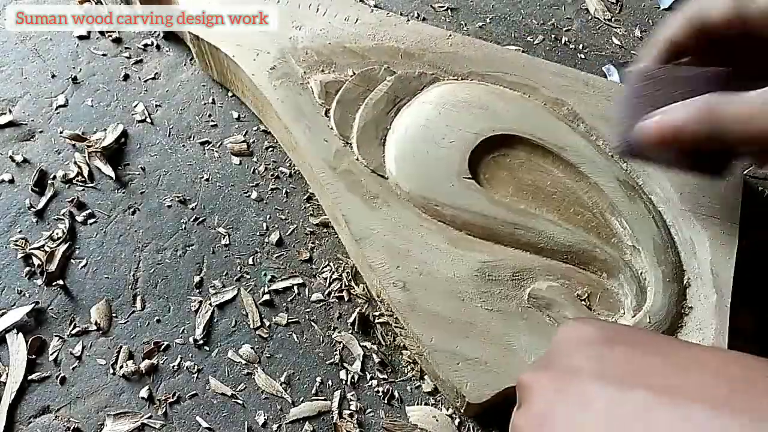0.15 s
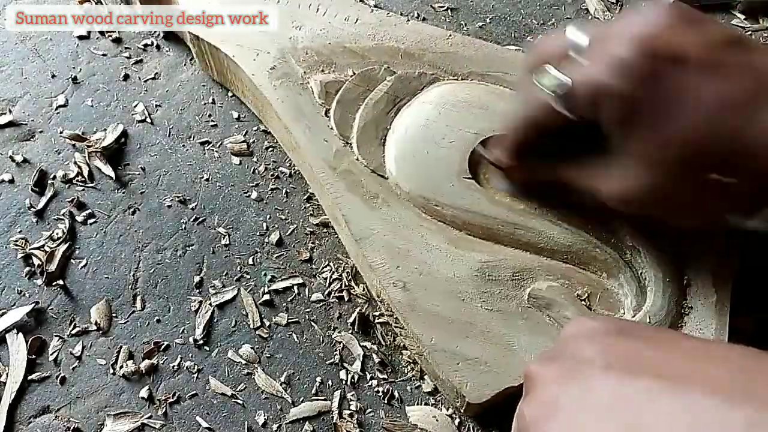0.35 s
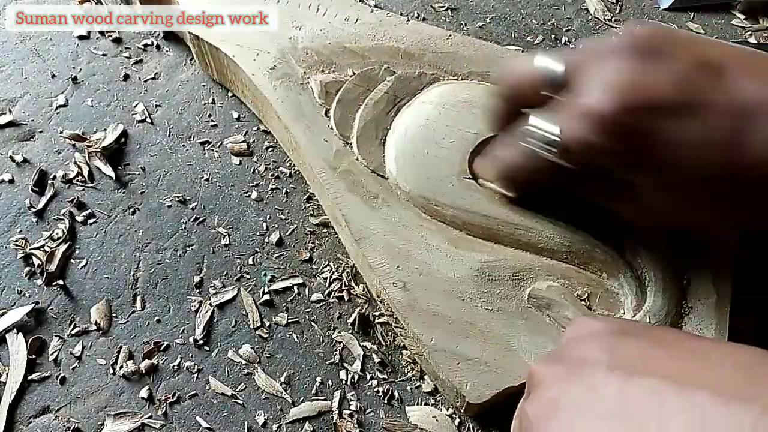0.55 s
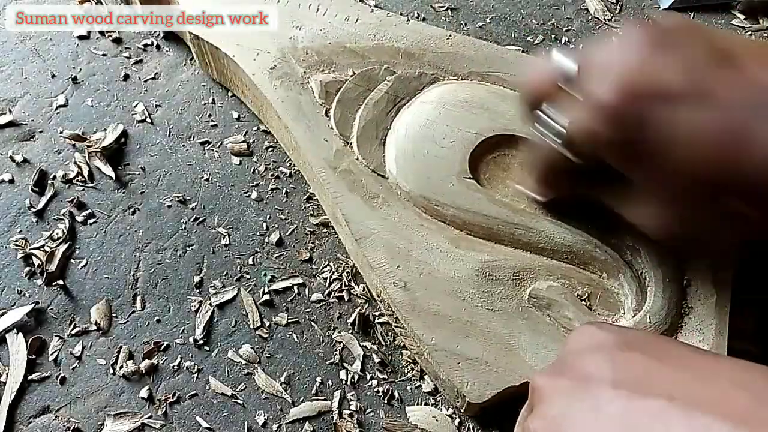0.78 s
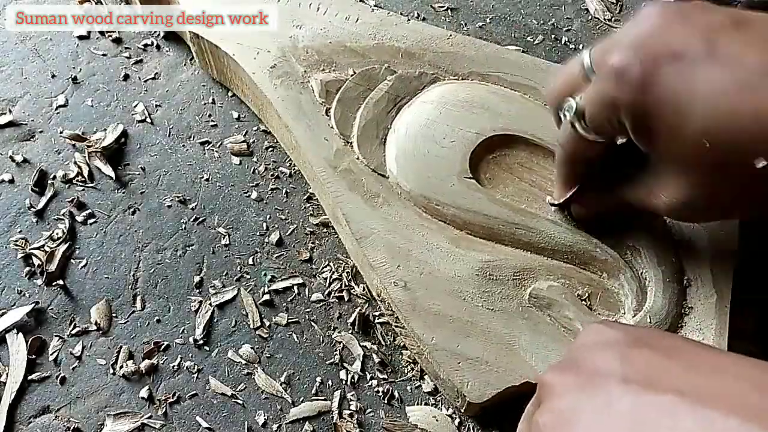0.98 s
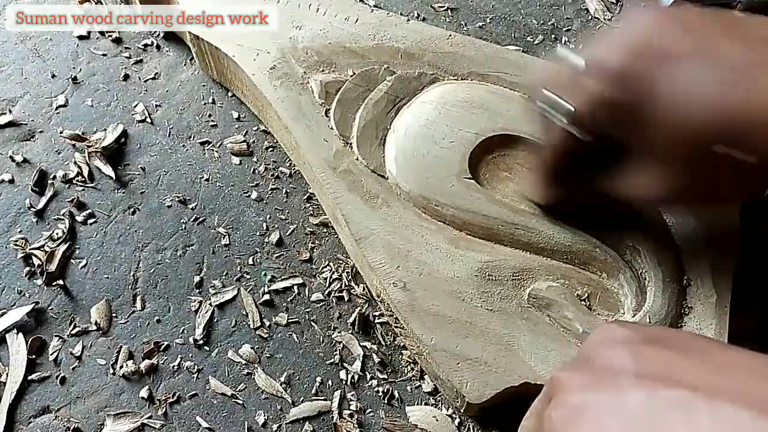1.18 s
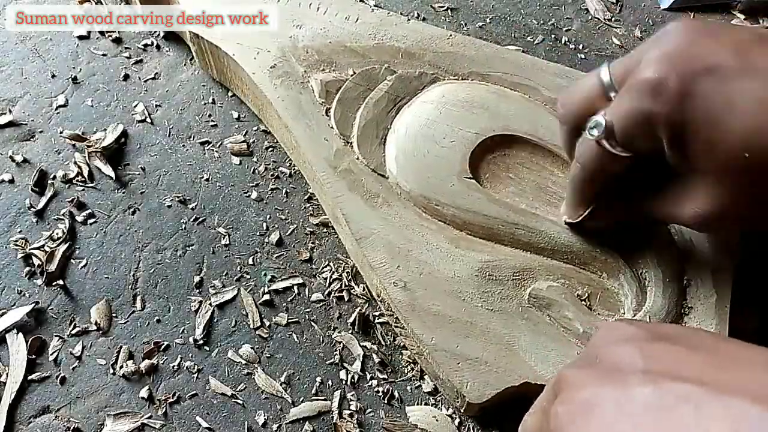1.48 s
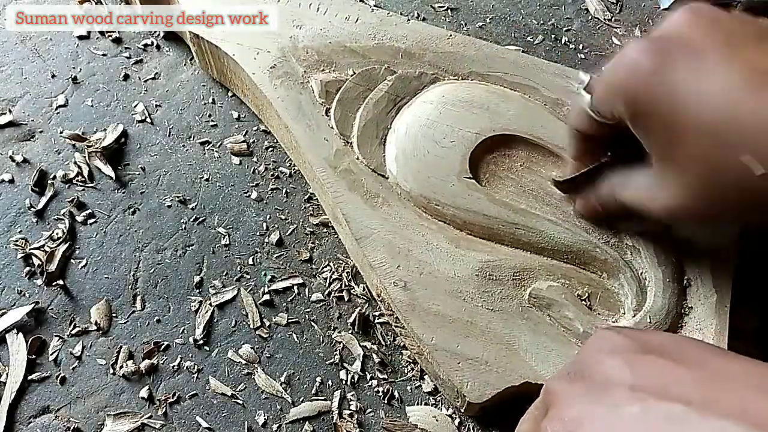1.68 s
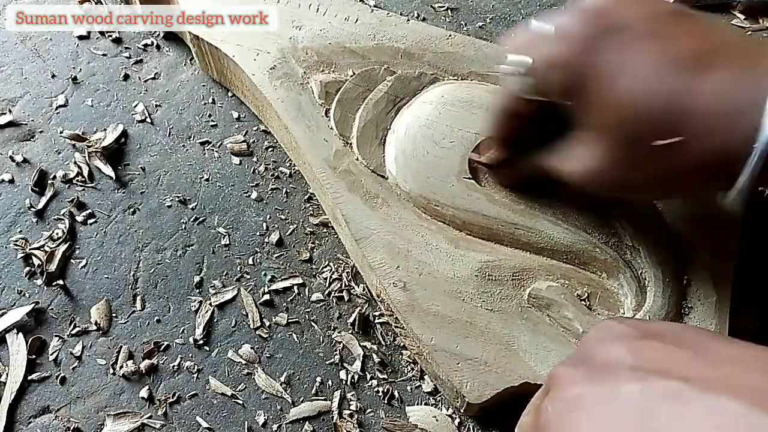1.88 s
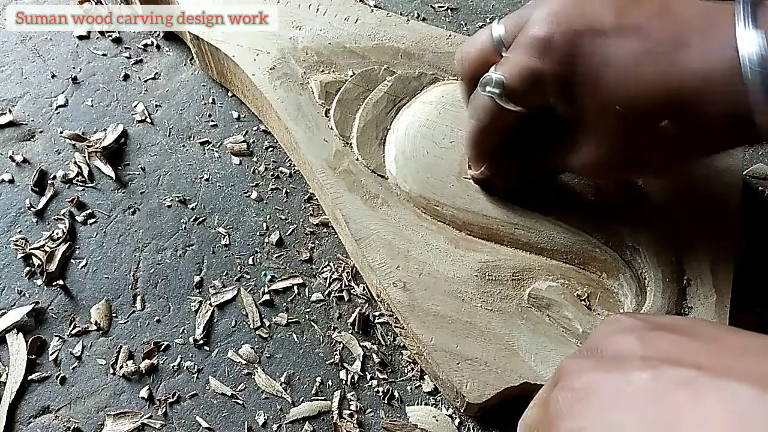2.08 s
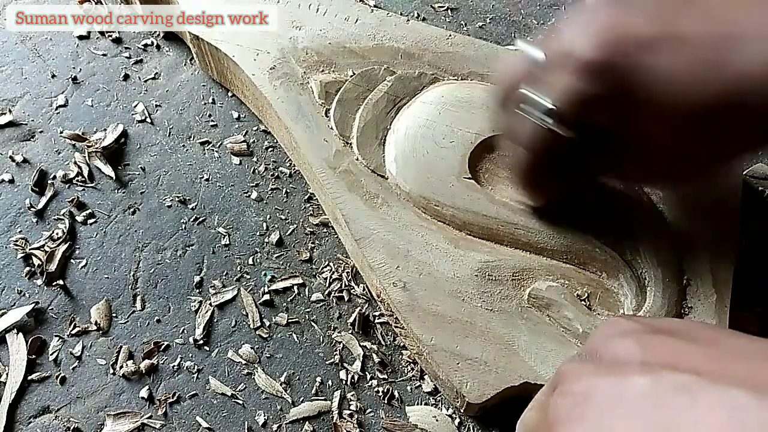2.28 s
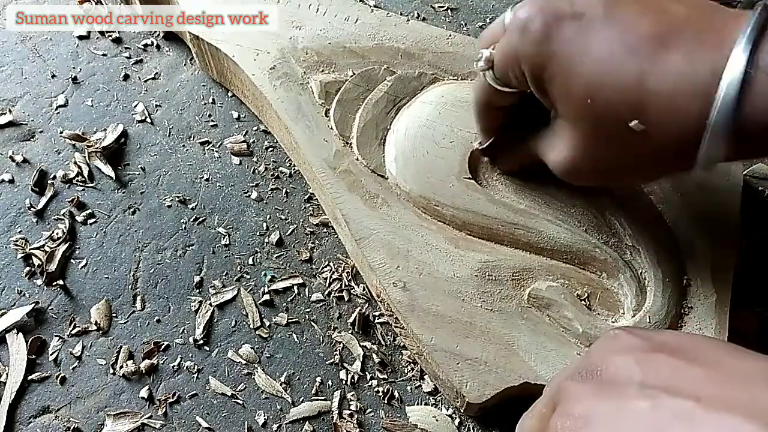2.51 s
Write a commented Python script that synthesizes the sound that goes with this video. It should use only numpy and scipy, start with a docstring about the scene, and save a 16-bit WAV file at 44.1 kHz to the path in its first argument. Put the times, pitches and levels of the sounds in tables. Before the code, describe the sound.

Fast hand sanding on carved wood makes a close, dry rasp dotted with gritty ticks. Late on, the paper squeaks twice and drags over an edge before the strokes continue, over a small workshop's soft rumble.

```python
"""A small workshop rumbles softly throughout. First a folded scrap of sandpaper rustles in the fingers,
squeaks faintly and is set on a wood carving with a few ticks. Then it is rubbed to and fro, about 17
strokes a second: grit scratches, the paper hisses, the wood rings faintly, and now and then a grain
catches with a tick. Near the end the paper squeaks twice and drags over an edge; then the strokes resume."""
import sys
import numpy as np
from scipy import signal
from scipy.fft import rfft, irfft, next_fast_len
from scipy.io import wavfile

SR = 44100
rng = np.random.default_rng(int(sys.argv[2]) if len(sys.argv) > 2 else 0)


def pcm_store(signal):
    """Save signal as 16-bit PCM."""
    levels = np.round(np.clip(np.atleast_2d(signal), -1, 1) * 32767)
    wavfile.write(sys.argv[1], SR, levels.astype(np.int16).T)


N = 116865
T = np.arange(N) / SR


def from_db(db):
    """Turn decibels into a number to multiply by (a gain)."""
    return 10 ** (np.asarray(db) / 20)


def rms_one(x):
    """Scale a signal so that its average power is 1."""
    return x / np.sqrt(np.mean(x ** 2) + 1e-20)


def per_bin(points):
    """Spread a (frequency, value) table over all the frequencies that the filters use."""
    hz, value = np.transpose(points)
    grid_hz = np.linspace(1e-3, SR / 2, next_fast_len(N) + 1)
    return np.interp(np.log(grid_hz), np.log(hz), value)


def filtered(x, gain):
    """Turn each frequency up or down, with no ringing ahead of the sound (minimum phase)."""
    size = 2 * (len(gain) - 1)
    cepstrum = irfft(np.log(gain + 1e-6))
    cepstrum[1:size // 2] *= 2
    cepstrum[size // 2 + 1:] = 0
    return irfft(rfft(x, size) * np.exp(rfft(cepstrum)))[..., :N]


def coloured(x, spectrum):
    """Give white noise a tone colour and keep its power."""
    return filtered(x, rms_one(from_db(per_bin(spectrum))))


def resonance(x, hz, width_hz):
    """Make white noise ring at one pitch and keep its power; narrower rings longer."""
    r = np.exp(-np.pi * width_hz / SR)
    feedback = [1, -2 * r * np.cos(2 * np.pi * hz / SR), r * r]
    return signal.lfilter(np.sqrt((1 - r * r) / 2) * np.array([1, 0, -1]), feedback, x)


def two_ears(noises, likeness):
    """Mix three noises into left and right: the first is shared, then one for each side."""
    alike = np.clip(per_bin(likeness), .01, .99)
    return filtered(noises[0], np.sqrt(alike)) + filtered(noises[1:], np.sqrt(1 - alike))


def drift(rate_hz):
    """A smooth random wobble, typically about 1 in size."""
    r = np.exp(-2 * np.pi * rate_hz / SR)
    smooth = signal.lfilter([1], [1, -2 * r, r * r], rng.standard_normal(N + SR))
    return rms_one(smooth[SR:])


def level_curve(rows):
    """A gain that follows (time, level) points and is zero outside them."""
    s, db = np.transpose(rows)
    return np.where((T >= s[0]) & (T <= s[-1]), from_db(np.interp(T, s, db)), 0)


# Tone colour of the rumble: (frequency [Hz], relative level [dB])
RUMBLE_COLOUR = [(33, 0), (70, -4.5), (115, -7), (160, -2), (215, -6.5), (330, -16), (850, -19),
                 (1400, -21), (1850, -24), (2800, -29), (14000, -27)]
# How alike the rumble is in both ears: (frequency [Hz], likeness [0 to 1])
RUMBLE_LIKENESS = [(30, 0.88), (160, 1), (400, 0.84), (900, 0.39), (2000, 0.43)]
def rumble(level_db=-56.5):
    """The workshop's background: soft, steady, low noise."""
    noise = two_ears(rng.standard_normal((3, N)), RUMBLE_LIKENESS)
    return from_db(level_db) * coloured(noise, RUMBLE_COLOUR)


# How firmly the paper slides before the first stroke: (time [s], level [dB])
RUSTLE_TOUCH = [(0, -62), (.045, -53.5), (.09, -68), (.19, -63.5), (.21, -49.5), (.218, -69), (.235, -68)]
# Tone colour of the rustle: (frequency [Hz], relative level [dB])
RUSTLE_COLOUR = [(2500, -5), (6000, -7.5), (9000, 3.5), (12500, -18)]
def rustle(wood_db=-9):
    """The loose paper slides in the fingers and brushes the wood."""
    touch = level_curve(RUSTLE_TOUCH)
    return coloured(grit() * touch, RUSTLE_COLOUR) + from_db(wood_db) * wood(grit() * touch)


COARSE_PER_S, COARSE_SPREAD_DB = 4000, 1.5  # coarse grit hits less often
# How alike the grit is in both ears: (frequency [Hz], likeness [0 to 1])
GRIT_LIKENESS = [(600, 0.25), (2300, 0.17), (2680, 1), (2950, 0.82), (3500, 0.27), (6000, 0.37),
                 (12000, 0.11)]
def grit(per_s=22000, spread_db=2):
    """Grains of sand make a dense stream of tiny hits of uneven size."""
    hit = rng.random(N) < per_s / SR
    size = from_db(spread_db * np.minimum(rng.exponential(1, N), 5))
    return rms_one(two_ears(hit * size * rng.standard_normal((3, N)), GRIT_LIKENESS))


# Tone colour of scraped wood: (frequency [Hz], relative level [dB])
WOOD_COLOUR = [(600, -8.5), (1500, -15), (2100, 6), (3300, 1), (8000, -10.5)]
# Notes at which the wood rings: (pitch [Hz], width [Hz], relative level [dB])
WOOD_NOTES = [(1890, 170, -5), (2450, 110, -17)]
# The hollow note grows as the hand moves in: (time [s], relative level [dB])
HOLLOW_GROWTH = [(1.0, -12), (1.5, -6.5)]
def wood(drive):
    """The carving answers a scrape or knock with a broad rasp, two rings and a low hollow note."""
    s, hollow_db = np.transpose(HOLLOW_GROWTH)
    hollow = resonance(drive * from_db(np.interp(T, s, hollow_db)), hz=818, width_hz=90)
    rings = sum(from_db(db) * resonance(drive, hz, width) for hz, width, db in WOOD_NOTES)
    return coloured(drive, WOOD_COLOUR) + hollow + rings


# Squeaks: (start [s], length [s], first pitch [Hz], last pitch [Hz], level [dB], wobble [share of pitch])
SQUEAKS = [(0.06, 0.057, 4100, 5050, -62, .035), (2.153, 0.0357, 5750, 5390, -45.5, .05),
           (2.184, 0.0443, 5520, 5090, -41.5, .055)]
def squeaks(wobble_hz=600, flicker_db=3.0):
    """The paper sticks and slips so fast that it whistles, with an unsteady gliding pitch."""
    out, wobble = np.zeros(N), drift(wobble_hz)
    for start, length, start_hz, end_hz, db, unsteady in SQUEAKS:
        progress = np.clip((T - start) / length, 0, 1)
        hz = (start_hz + (end_hz - start_hz) * progress) * (1 + unsteady * wobble)
        swell = from_db(db) * np.sin(np.pi * progress)
        out += swell * np.sin(2 * np.pi * np.cumsum(hz) / SR)
    return out * from_db(flicker_db * drift(wobble_hz))


# Bright tone colour of a tick: (frequency [Hz], relative level [dB])
TICK_COLOUR = [(2000, -17), (5000, -5), (8000, 1), (14000, -6)]
# The paper is set down or grit catches: (time [s], level [dB], knock compared with the tick [dB])
TICKS = [(0.1936, -37, -1), (0.2263, -44, -14), (0.2603, -34, -14), (0.2785, -36, -17), (0.347, -35, -16),
         (.3733, -28, -25), (0.9502, -28, -24), (1.0076, -24.5, -32), (1.2533, -28, -20),
         (1.7969, -32, -16)]
def ticks(decay_s=.0006):
    """The paper lands or a caught grain lets go: a sharp crack that also knocks the wood."""
    cracks, knocks = np.zeros((2, N))
    for s, db, knock_db in TICKS:
        crack = from_db(db) * (T >= s) * np.exp(-abs(T - s) / decay_s)
        cracks += crack
        knocks += crack * from_db(knock_db)
    noise = two_ears(rng.choice([-1, 1], (3, N)), GRIT_LIKENESS)
    _, _, fold_gain = along_hand()
    snap = noise * cracks
    return coloured(snap, TICK_COLOUR) + fold_ring(snap * fold_gain) + wood(noise * knocks)


# Moments when clinging paper breaks loose: (time [s])
RELEASES = [0.601, .771, 0.891, 0.946, 1.066, 1.362, 1.481, 1.671, 1.716, 1.787, 1.833, 1.947, 2.168, 2.553]
# Each stroke lasts until the next:
# (start [s], level [dB], fastest moment [share of the stroke], sharpness of the peak [exponent])
STROKES = [ (0.235, -39, 0.43, 0.98), (0.287, -36.5, 0.82, 0.6), (0.341, -37.5, 0.54, 1.64),
           (0.401, -38, 0.52, 1.2), (0.464, -41, 0.46, 0.61), (.526, -39, 0.54, 0.97),
           (0.582, -40, 0.38, 0.6), (.645, -40, 0.51, 1.35), (.705, -41, 0.43, 1.1),
           (0.755, -37.5, 0.18, 1.16), (0.823, -42, 1, 0.85), (0.876, -39.5, 0.5, 1.16),
           (0.94, -40.5, 0.64, 0.51), (0.99, -38.5, 0.31, 1.04), (1.054, -39.5, 0.38, 0.56),
           (1.106, -39, 0.56, 1), (1.168, -42, 0.63, 1.02), (1.228, -39, 0.43, 0.81),
           (1.29, -40, 0.35, 0.91), (1.352, -40, 0.34, 0.54), (1.407, -42, 0.44, 1.5),
           (1.47, -39.5, 0.22, 0.48), (1.527, -41, 0.48, 1.3), (1.589, -37, 0.64, 2.25),
           (1.653, -40.5, 0.45, 1.2), (1.705, -39, 0.16, 1.16), (1.768, -37, 0.32, 2.3),
           (1.82, -39, 0.38, 0.42), (1.876, -39.5, 0.53, 2.3), (1.937, -40, 0.26, 0.54),
           (1.986, -42, 0.23, 0.52), (2.044, -41.5, 0.45, 1.6), (2.105, -43.5, 0.65, 0.4),
           (2.161, -40.5, 0.49, 1), (2.215, -40.5, 0.66, 0.45), (2.265, -40, 1, 0.24),
           (2.324, -46, 0.16, 0.65), (2.407, -48, 0.74, 0.6), (2.473, -40, 0.7, 2.5),
           (2.535, -42, 0.4, 1.35), (2.594, -42.5, 0.48, 1.07)]
def friction(cling_s=.016, cling_db=-8):
    """Rubbing follows the hand's speed, which is zero at every turn; clinging paper holds it back."""
    gain = np.zeros(N)
    for (_, db, fastest, sharpness), span in zip(STROKES, stroke_spans()):
        progress = np.linspace(0, 1, span.stop - span.start)
        travel = np.interp(progress, [0, np.clip(fastest, .1, .9), 1], [0, .5, 1])
        gain[span] = from_db(db) * np.sin(np.pi * travel) ** sharpness
    for s in RELEASES:
        gain[(T > s - cling_s) & (T < s)] *= from_db(cling_db)
    return gain


def stroke_spans(last_turn_s=2.65):
    """The samples that each stroke covers."""
    turns_s = np.array([row[0] for row in STROKES] + [last_turn_s])
    turns = (turns_s * SR).astype(int)
    return [slice(start, min(end, N)) for start, end in zip(turns, turns[1:])]


# Tone colour of the paper's hiss: (frequency [Hz], relative level [dB])
HISS_COLOUR = [(1500, -20.5), (2800, -6), (3600, -10), (6300, -5.5), (7300, -0.5), (8300, 0.5),
               (9300, -2.5), (11000, -4.5), (14200, -11)]
def sanding(hiss_db=-5.5, chatter_db=.9, chatter_hz=140):
    """Grit makes the paper and wood hiss and ring; the paper's uneven grip makes the level flutter."""
    _, wood_gain, fold_gain = along_hand()
    rub = friction() * from_db(chatter_db * drift(chatter_hz))
    hiss = from_db(hiss_db) * coloured(grit() * rub, HISS_COLOUR)
    rasp = contact_ring(grit(COARSE_PER_S, COARSE_SPREAD_DB) * rub)
    return hiss + rasp + fold_ring(grit() * rub * fold_gain) + wood(grit() * rub * wood_gain)


# The hand works along the carving's hollow:
# (time [s], left minus right [dB], relative wood level [dB], relative level of the fold's ring [dB])
HAND_PATH = [(.25, -1, -19.5, -13.5), (.75, 0.5, -13, -7), (1.05, -1.5, -16.5, -7), (1.4, -0.2, -15, -5.5),
             (1.6, -1, -14, -1), (1.72, -0.5, -18.5, -9.5), (2.6, 0, -13.5, -6.5)]
def along_hand():
    """Three gains that change as the hand moves: left over right, the wood and the paper's fold."""
    s, *columns = np.transpose(HAND_PATH)
    return [from_db(np.interp(T, s, column)) for column in columns]


def contact_ring(drive, spots=3, low_hz=3500, high_hz=7600, level_db=-14.8):
    """Each stroke presses new spots of paper on the wood; they ring at a low, middle and high pitch."""
    out = np.zeros((2, N))
    for span in stroke_spans():
        for k in range(spots):
            hz = low_hz * (high_hz / low_hz) ** ((k + rng.random()) / spots)
            out[:, span] += (-1) ** k * resonance(drive[:, span], hz, width_hz=310)
    return from_db(level_db) * out


# Notes at which the paper's fold rings: (pitch [Hz], relative level [dB])
FOLD_NOTES = [(8250, -2.5), (8830, -3.5)]
def fold_ring(drive, retune_share=.025):
    """The folded paper bends differently in each stroke, so its notes shift a little."""
    out = np.zeros((2, N))
    for span in stroke_spans():
        for hz, db in FOLD_NOTES:
            retuned_hz = hz * (1 + retune_share * rng.standard_normal())
            out[:, span] += from_db(db) * resonance(drive[:, span], retuned_hz, width_hz=420)
    return out


# How hard the paper drags over the edge: (time [s], level [dB])
DRAG_FORCE = [(2.24, -62), (2.297, -45), (2.333, -46), (2.38, -77)]
# Hard catches on the way: (time [s], level [dB])
CATCHES = [(2.302, -39.5), (2.3115, -38.5), (2.329, -34.5)]
# Notes at which the edge rings: (pitch [Hz], relative level [dB])
EDGE_NOTES = [(1170, -12.5), (1410, -14.5), (3190, -13), (4680, -9), (5200, -10), (6220, -10), (8180, -7)]
def edge_drag(catch_s=.003, pitch_over_width=24, hiss_db=-6, bass_cut_hz=950):
    """Coarse grit drags over a thin edge, catches on it and sets it ringing, without bass."""
    catches = sum(from_db(db) * np.exp(-abs(T - s) / catch_s) for s, db in CATCHES)
    force = level_curve(DRAG_FORCE) + catches
    drive = grit(COARSE_PER_S, COARSE_SPREAD_DB) * force
    ring = sum(from_db(db) * resonance(drive, hz, hz / pitch_over_width) for hz, db in EDGE_NOTES)
    hiss = from_db(hiss_db) * coloured(grit() * force, HISS_COLOUR)
    bass_cut = signal.butter(4, bass_cut_hz, "high", fs=SR, output="sos")
    return signal.sosfilt(bass_cut, ring + hiss)


# How the two sides compare: (frequency [Hz], left minus right [dB])
BALANCE = [(1900, -2), (2750, 2), (5500, -1.5), (6800, -1.5), (8200, -4.5), (10000, 0.5), (13000, 1.5)]
def at_ears(x, left_lag_s=.000204):
    """The hand is to the right, so the left is later and mostly softer; the balance moves with it."""
    half_db = per_bin(BALANCE) / 2
    delay = np.zeros(round(left_lag_s * SR))
    left = np.concatenate([delay, filtered(x[0], from_db(half_db))])[:N]
    right = filtered(x[1], from_db(-half_db))
    pan = np.sqrt(along_hand()[0])
    return np.array([left * pan, right / pan])


def room_echo(x, fade_s=.069, level_db=-9):
    """The small room adds a short blur of echoes, different on each side."""
    t = T[:SR // 2]
    tail = rng.standard_normal((2, len(t))) * from_db(-60 * t / fade_s) * (t > .002)
    tail /= np.sqrt(np.sum(tail ** 2, axis=1, keepdims=True))
    return from_db(level_db) * signal.fftconvolve(x, tail, axes=1)[:, :N]


def scene():
    """The hand's work, its echo and the workshop's rumble."""
    work = at_ears(rustle() + squeaks() + ticks() + sanding() + edge_drag())
    return work + room_echo(work) + rumble()


def record(dry, cutoff_hz=14250):
    """The highest treble is cut off steeply."""
    return signal.sosfilt(signal.ellip(10, .2, 75, cutoff_hz, fs=SR, output="sos"), dry)


dry = scene()
out = record(dry)
pcm_store(out)
```